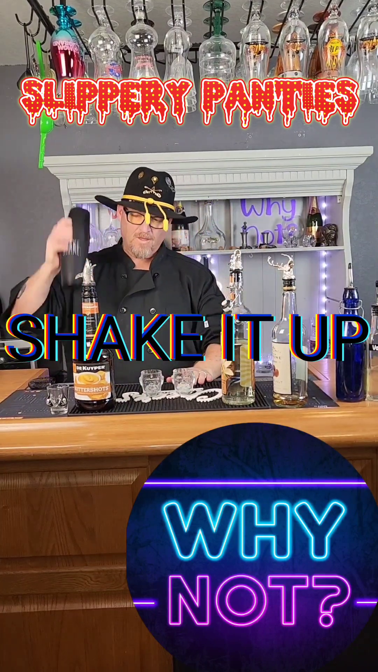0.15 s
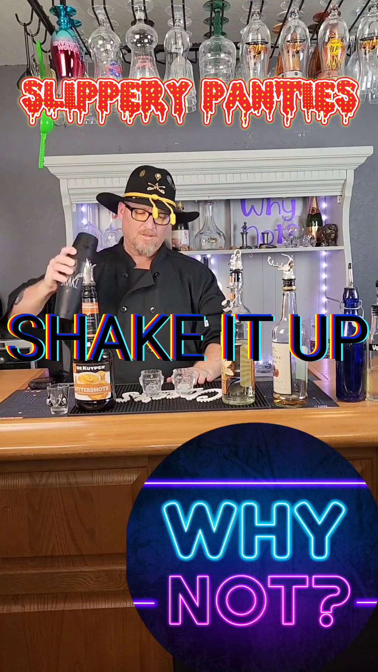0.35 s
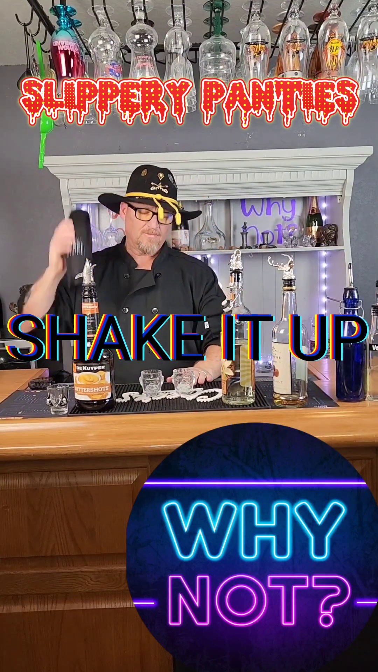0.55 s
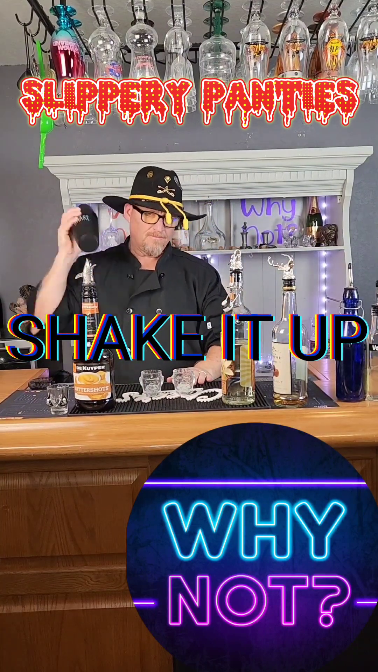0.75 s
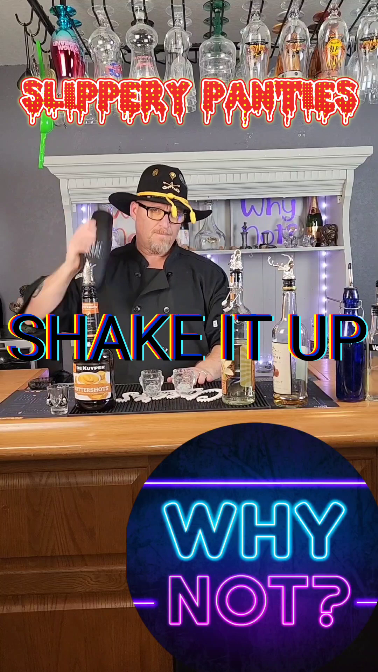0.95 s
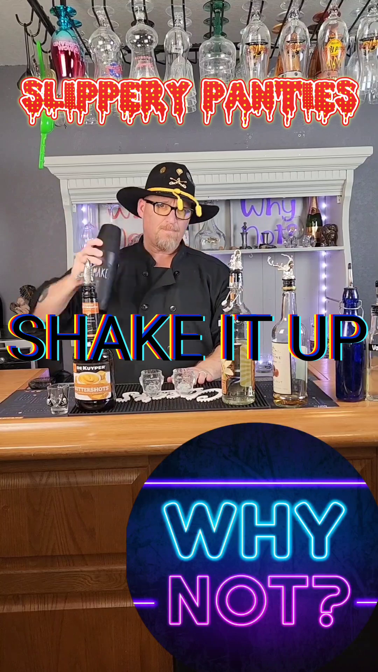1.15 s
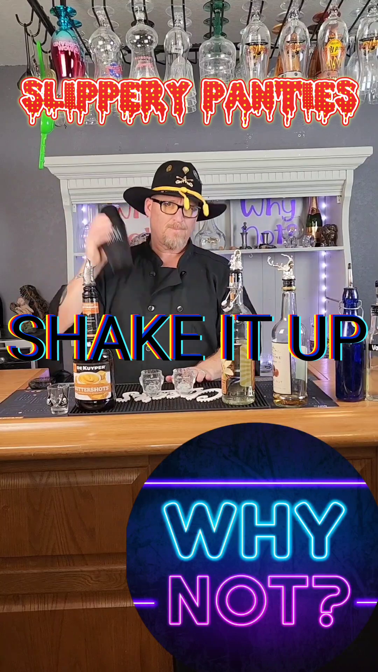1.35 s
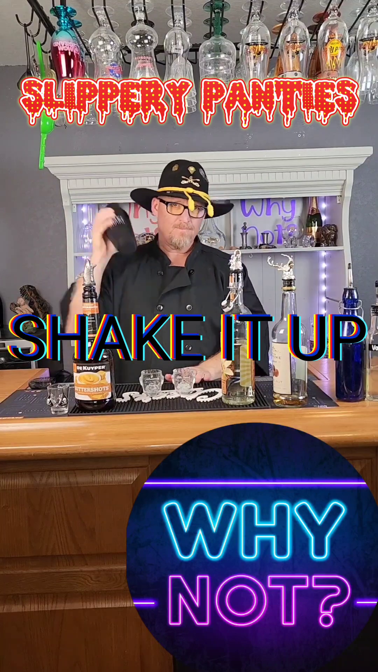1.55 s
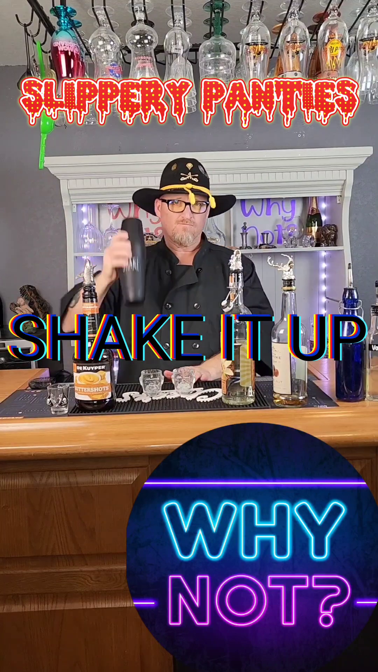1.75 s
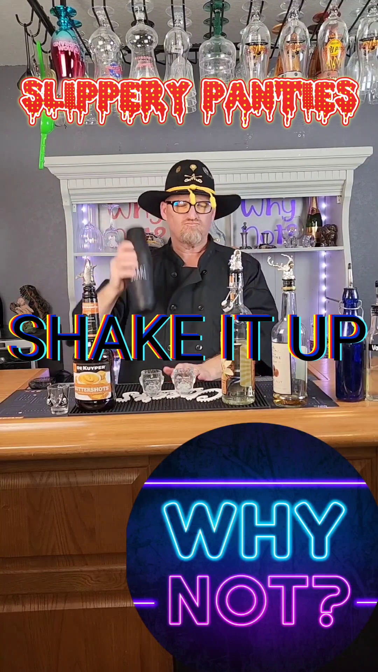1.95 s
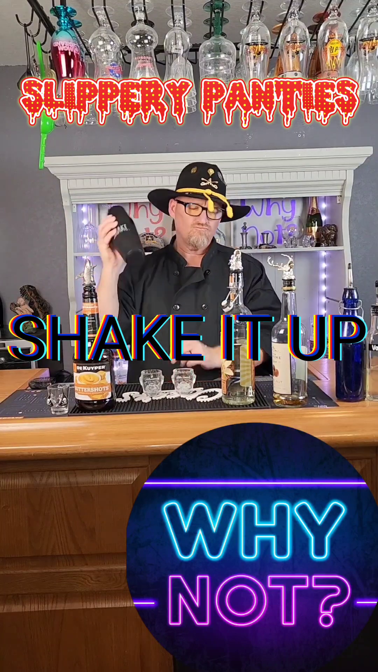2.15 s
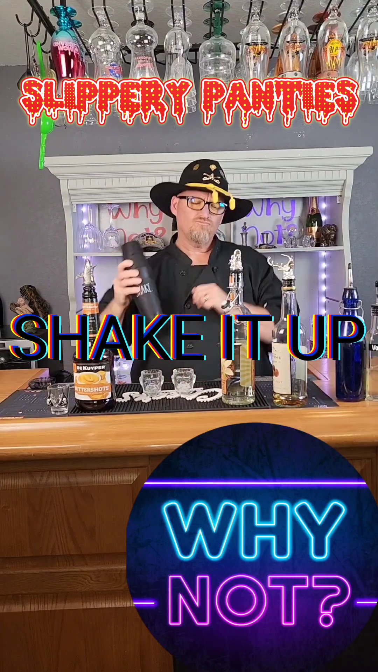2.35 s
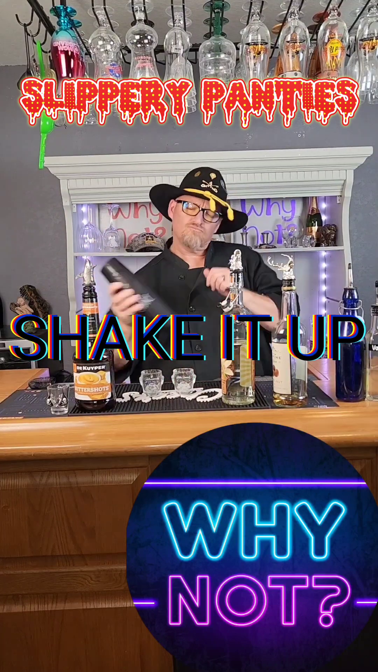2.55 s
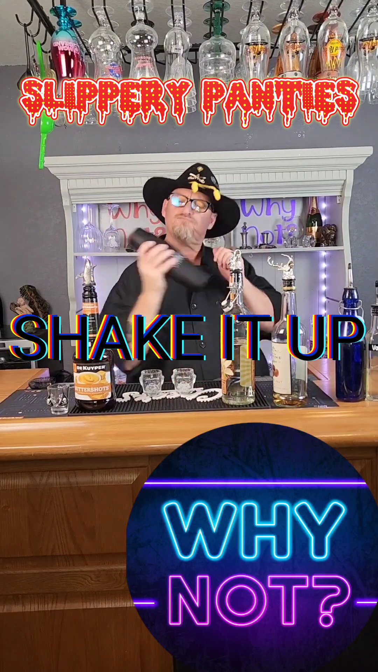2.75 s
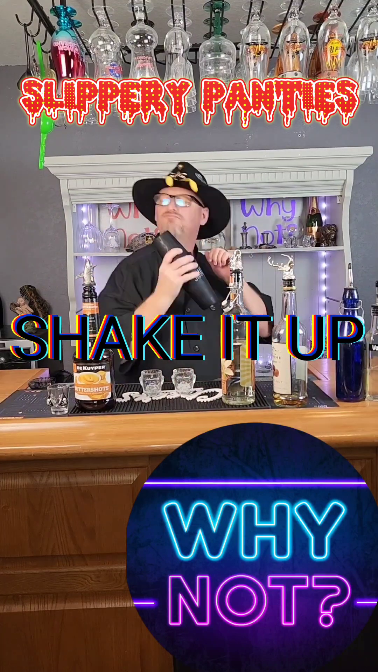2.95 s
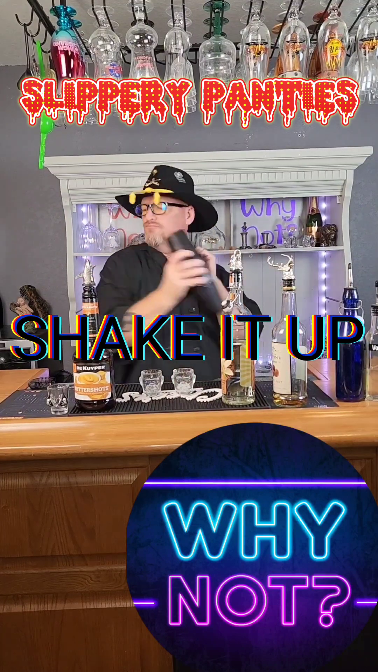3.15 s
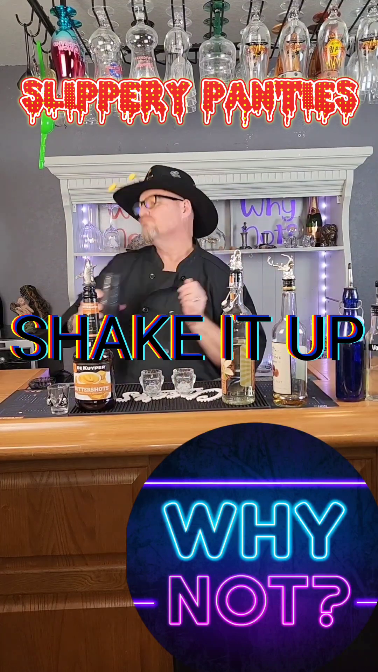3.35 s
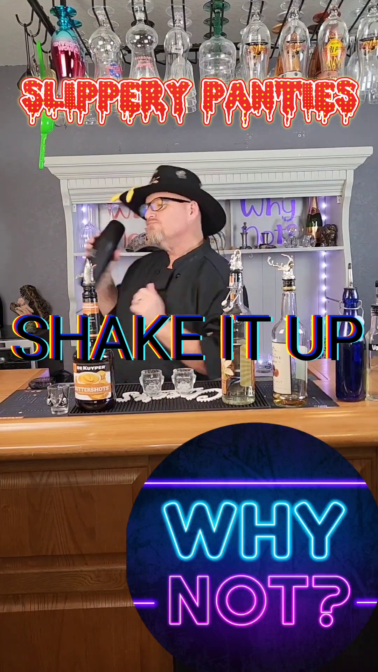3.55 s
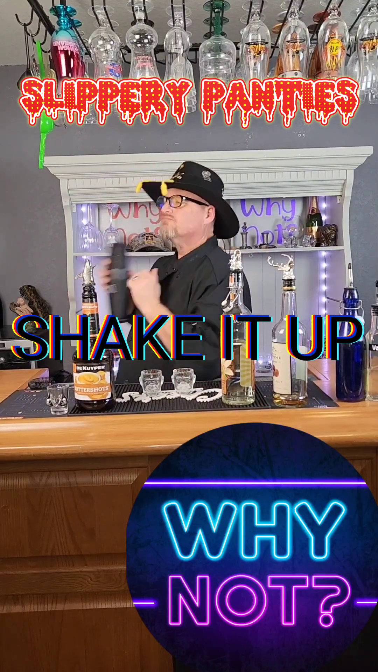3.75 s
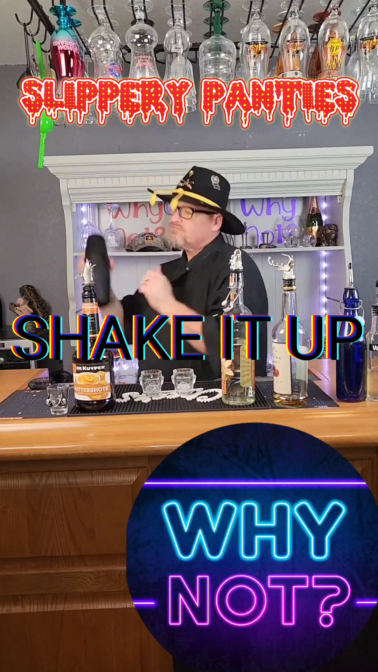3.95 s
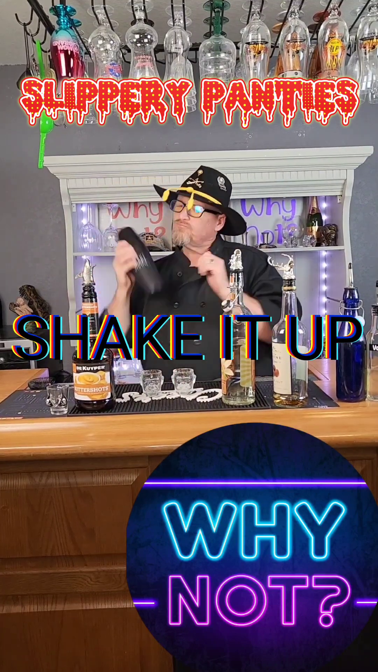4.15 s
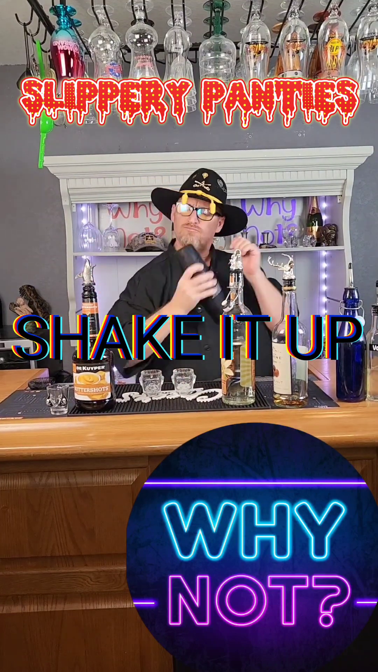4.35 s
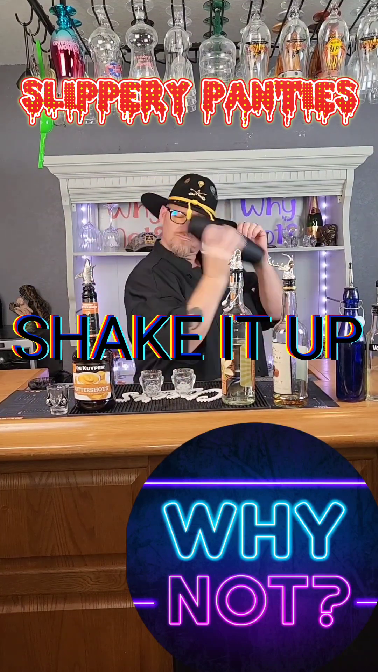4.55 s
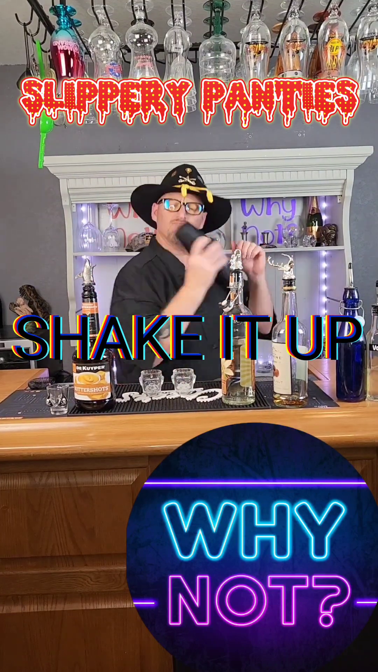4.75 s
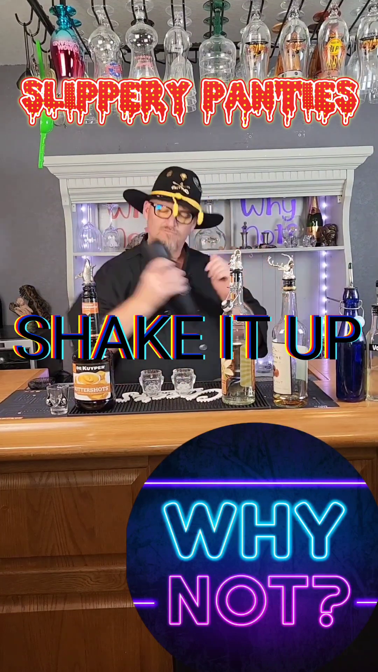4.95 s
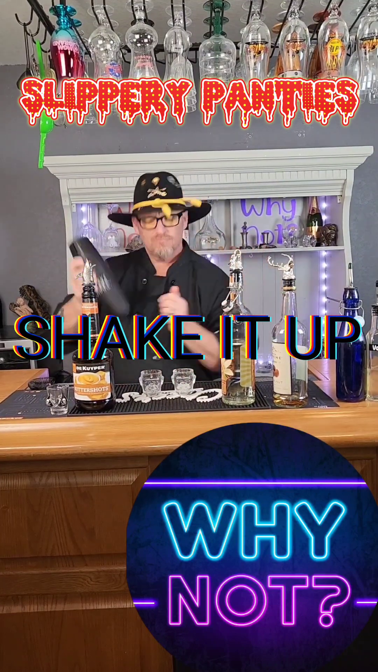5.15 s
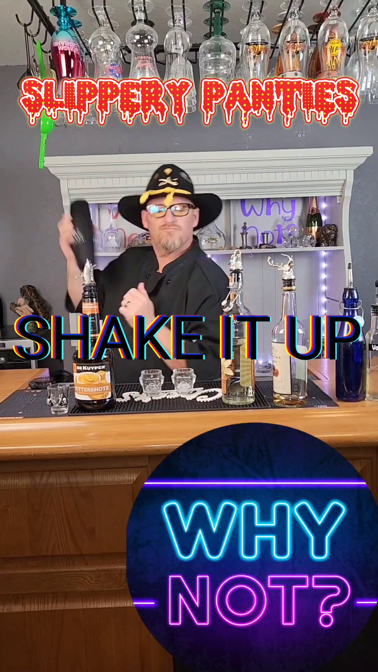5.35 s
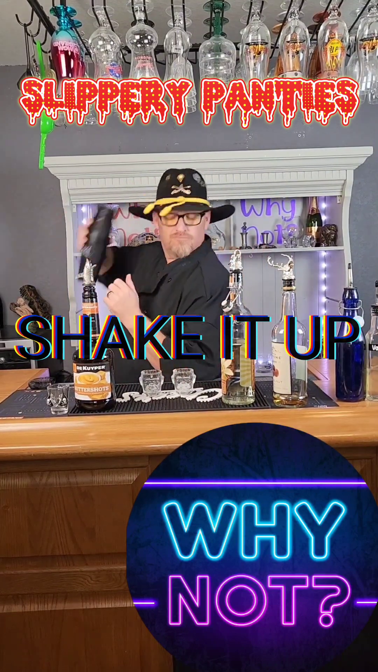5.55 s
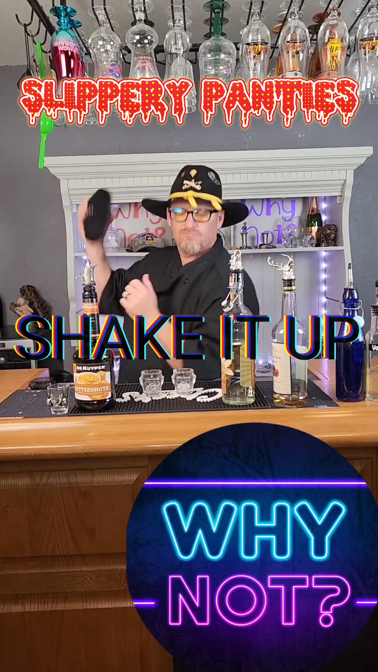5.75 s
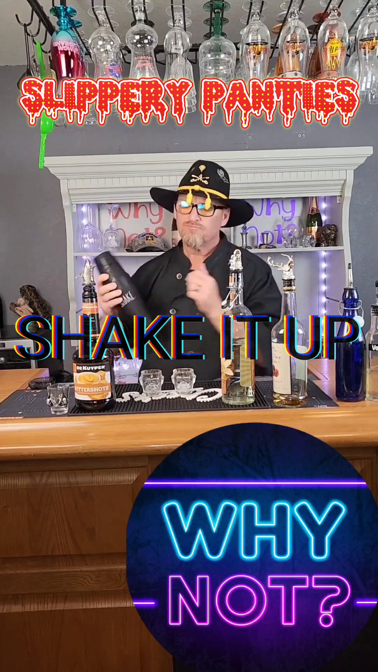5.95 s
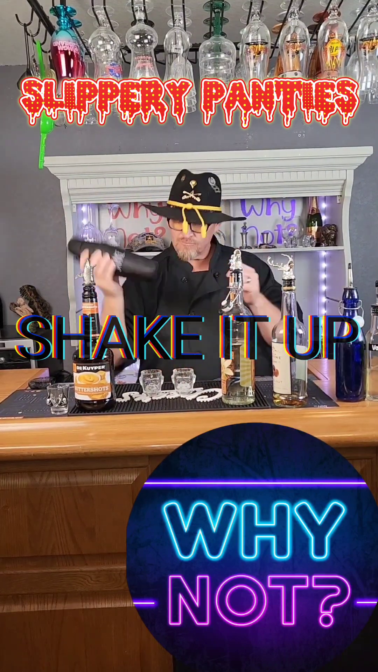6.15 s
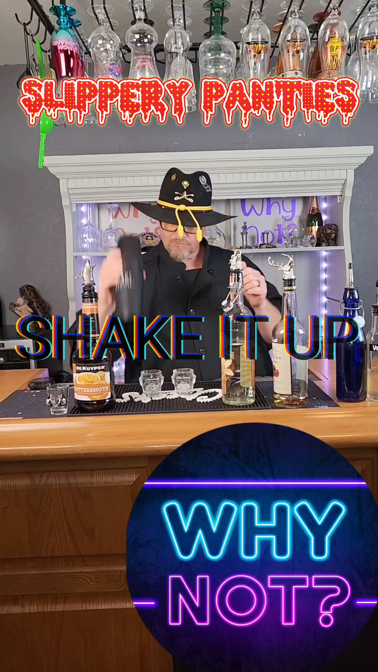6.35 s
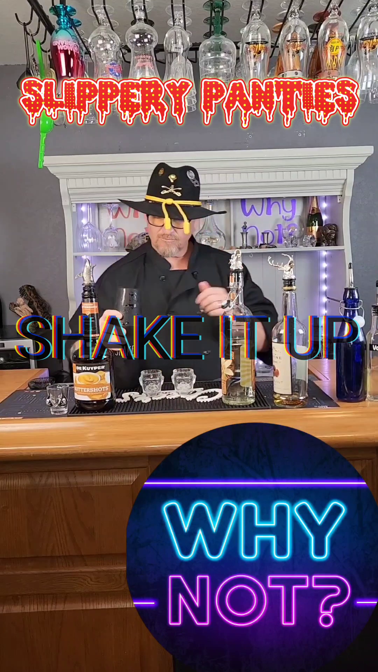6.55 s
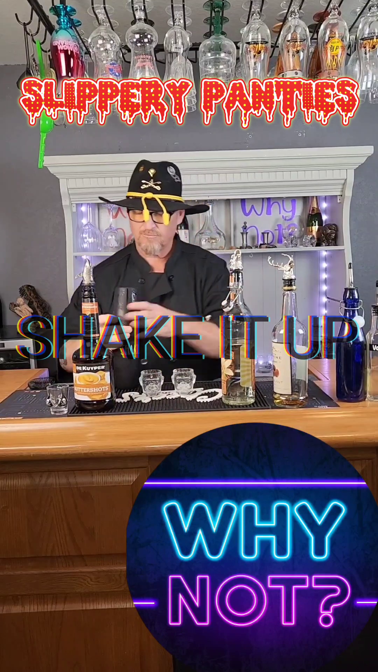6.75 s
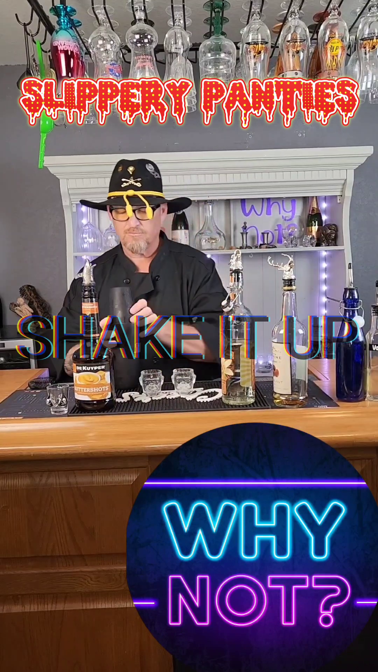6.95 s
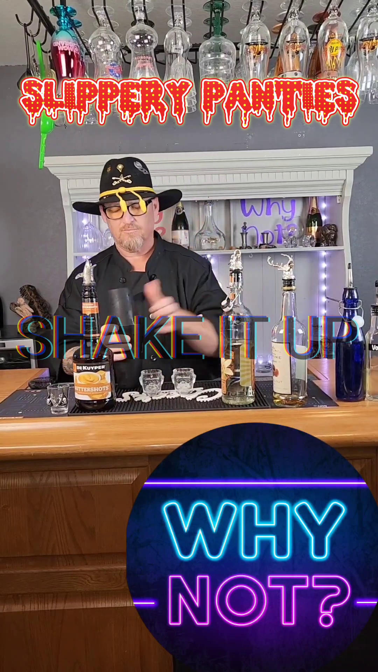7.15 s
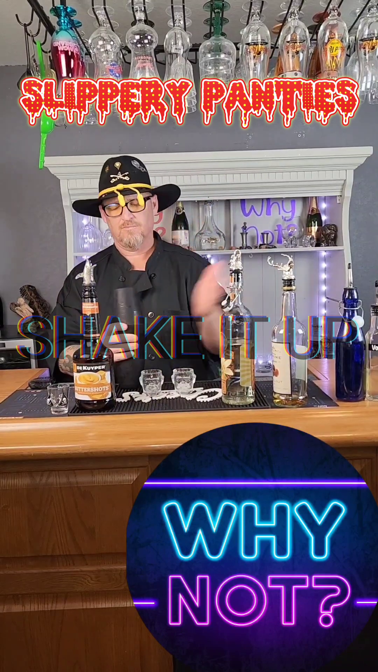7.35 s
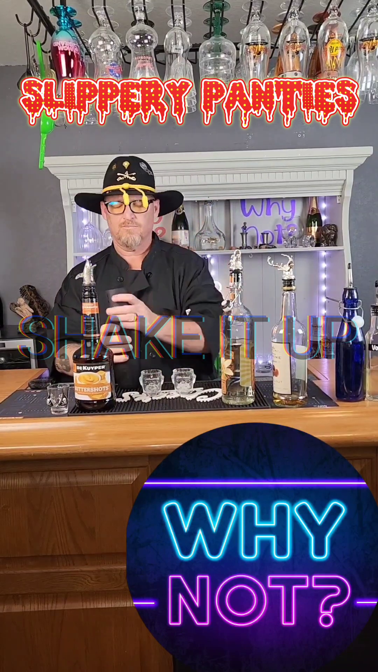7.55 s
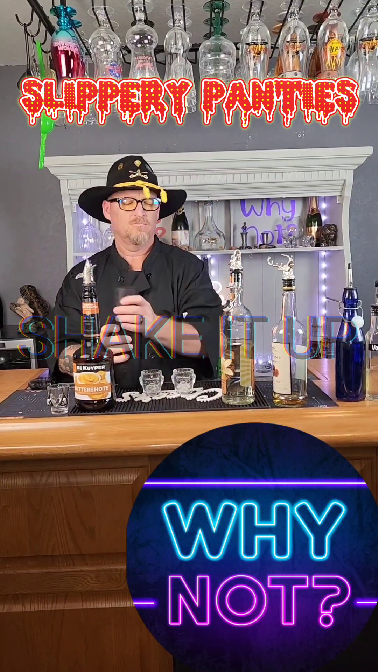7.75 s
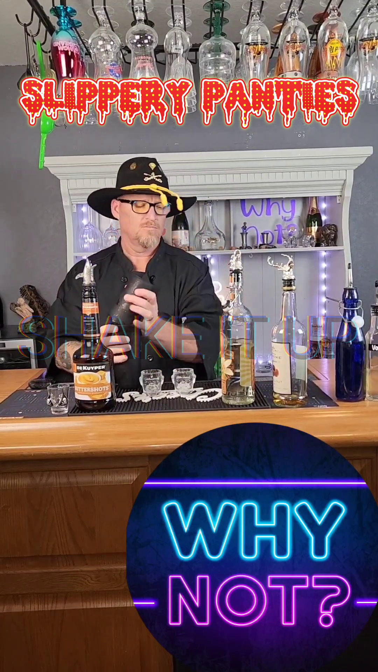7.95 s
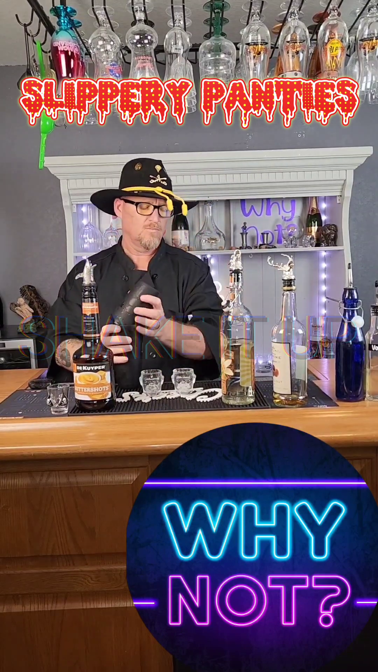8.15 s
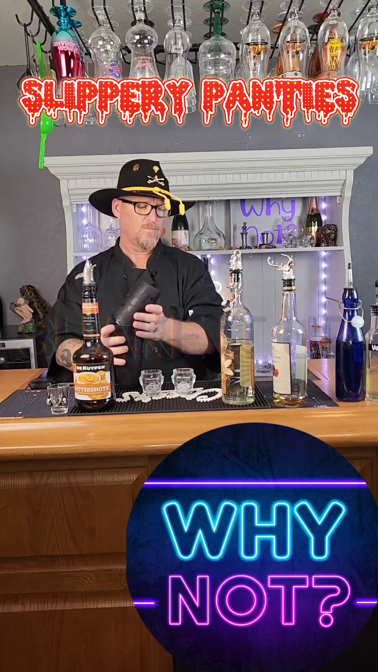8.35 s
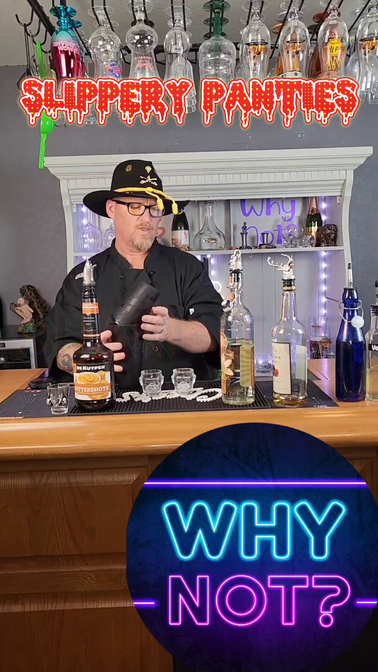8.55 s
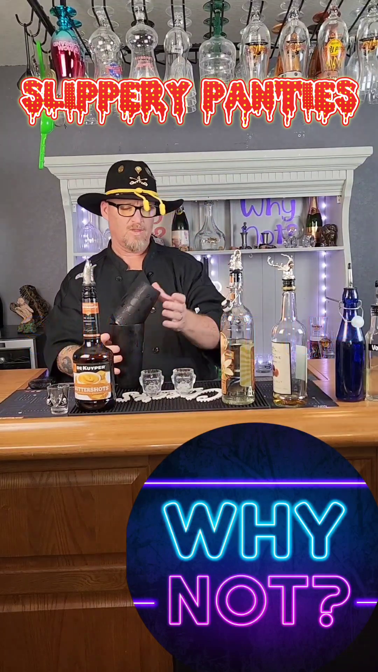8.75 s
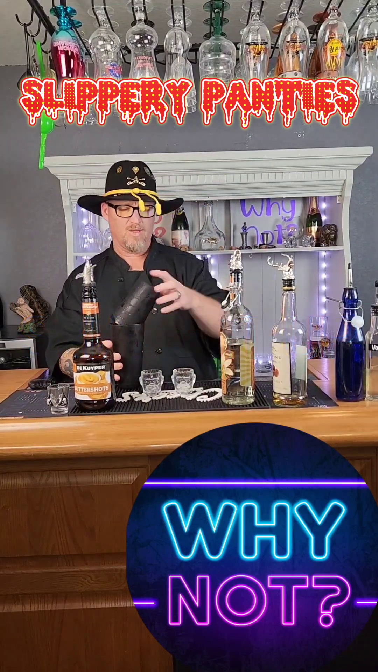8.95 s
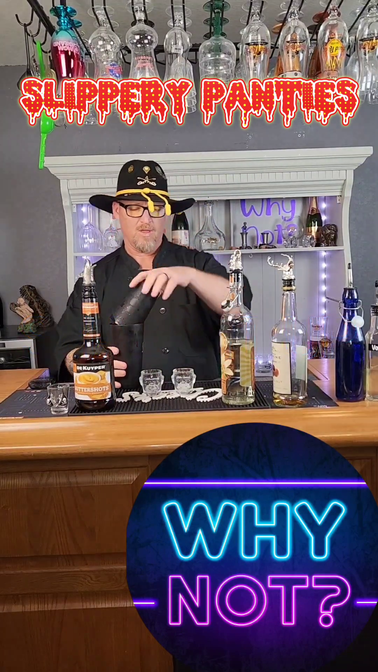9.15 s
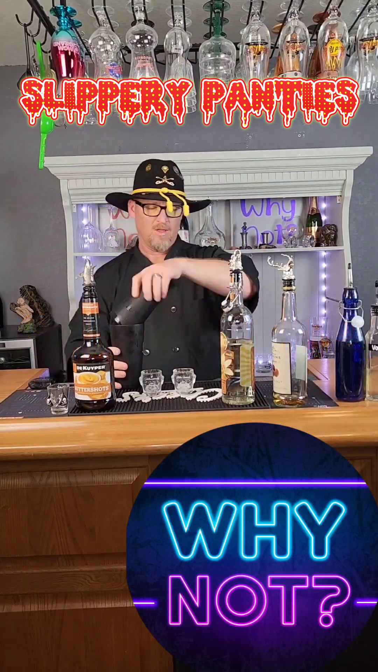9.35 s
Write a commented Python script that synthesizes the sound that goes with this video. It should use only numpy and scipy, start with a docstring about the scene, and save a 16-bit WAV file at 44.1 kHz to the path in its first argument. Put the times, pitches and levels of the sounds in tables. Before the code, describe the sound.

In a small, lively barroom, a metal cocktail shaker is shaken vigorously, cubes clattering and splintering while liquid sloshes. The quick strokes turn uneven, then end in a loud, close knock as the tin hits the wooden counter. After a short lull come a bright slap on the metal, a few taps and a soft pop. The shaking sounds roomy and slightly distant, with ventilation humming faintly underneath.

```python
"""A metal cocktail shaker full of ice and liquid, shaken hard behind the bar of a small, live room.
Cubes thud on the end caps, clatter on the wall and splinter while the liquid sloshes. The tin is slammed
onto the wooden counter, the ice settles, a palm slaps the seal free and the lid pops loose.
A two-port stereo microphone stands a little to the right of the action, far enough off for the shaking
to be more room than direct sound. Ventilation rumbles underneath."""
import sys
import numpy as np
from scipy import signal
from scipy.fft import rfft, irfft
from scipy.io import wavfile
from scipy.ndimage import uniform_filter1d

SR = 44100
rng = np.random.default_rng(int(sys.argv[2]) if len(sys.argv) > 2 else 0)


def transcribe(signal):
    """Save signal, clipped to [-1, 1], as a 16-bit WAV file at the path in sys.argv[1]."""
    frames = np.atleast_2d(signal).T
    limited = np.clip(frames, -1, 1)
    pcm = np.round(limited * 32767).astype(np.int16)
    wavfile.write(sys.argv[1], SR, pcm)


N = 414027
TIME = np.arange(N) / SR


def from_db(db):
    """Decibels to gain."""
    return 10 ** (np.asarray(db) / 20)


def unit_energy(x):
    """Scale so that the squares of each channel sum to one."""
    return x / np.sqrt(np.sum(x ** 2, axis=-1, keepdims=True) + 1e-20)


def at_hz(points, hz):
    """Read a table along a log-frequency axis."""
    known_hz, values = np.transpose(points)
    return np.interp(np.log(np.maximum(hz, 1)), np.log(known_hz), values)


def convolve(x, response):
    """Pass a sound through an impulse response, channel by channel."""
    x, response = np.atleast_2d(np.float32(x), np.float32(response))
    return signal.oaconvolve(x, response, axes=-1)[:, :N]


def colour(x, spectrum, size=8192):
    """A causal (minimum-phase) filter of this spectrum that keeps the power of white sound."""
    gain = from_db(at_hz(spectrum, np.fft.rfftfreq(size, 1 / SR)))
    cepstrum = irfft(np.log(gain))
    cepstrum[1:size // 2] *= 2
    cepstrum[size // 2 + 1:] = 0
    return convolve(x, unit_energy(irfft(np.exp(rfft(cepstrum)))))


def clicks(at, sizes):
    """Single-sample pulses at the given samples."""
    return np.bincount(at, sizes, N)[:N]


def strikes(rows):
    """Clicks from rows of t/s, level/dB."""
    s, db = np.transpose(rows)
    return clicks((s * SR).astype(int), from_db(db))


def ring(x, hz, t60):
    """A unit click sets a sine of height 1 ringing."""
    radius, angle = from_db(-60 / (t60 * SR)), 2 * np.pi * hz / SR
    return signal.lfilter([0, np.sin(angle)], [1, -2 * radius * np.cos(angle), radius ** 2], x + 1e-18)


def body(x, modes):
    """Drive all modes of an object; neighbouring modes move in opposite directions."""
    return sum((-1) ** k * from_db(db) * ring(x, hz, t60) for k, (hz, db, t60) in enumerate(modes))


# the decay of the barroom: f/Hz, t60/s
ROOM_T60 = [(80, 0.27), (300, 0.32), (1000, 0.24), (3000, 0.29), (8000, 0.25), (16000, 0.3)]
def room(x, direct_db, left_db, port_gap_s=0.000515, late_db=-25, late_stretch=2.3):
    """One spot as the microphone hears it: direct sound, then reflections dying band by band."""
    t = TIME[:SR * 3 // 4]
    hz = np.fft.rfftfreq(len(t), 1 / SR)
    mid, side = rfft(rng.standard_normal((2, len(t))))
    alike = 0.99 * np.sinc(2 * hz * port_gap_s)   # long waves reach both ports alike
    spectrum = np.sqrt(1 + alike) * mid + np.sqrt(1 - alike) * side * [[1], [-1]]
    edges_hz, tail = np.geomspace(30, 19000, 12), 0
    for low, high in zip(edges_hz, edges_hz[1:]):
        band = irfft(spectrum * (hz >= low) * (hz < high), len(t))
        fall_db = -60 * t / at_hz(ROOM_T60, np.sqrt(low * high))
        tail += band * (from_db(fall_db) + from_db(late_db + fall_db / late_stretch))
    response = unit_energy(tail * (t > .001))
    response[[0, 1], [0, 3]] += from_db(direct_db)   # the left port is reached 3 samples sooner
    return convolve(x, unit_energy(response)) * from_db([[left_db], [-left_db]])


def swung(x, swings_per_s, direct_db, left_db, spots=10):
    """The tin travels round a loop of spots behind the bar, each with reflections of its own."""
    position, heard = TIME * swings_per_s * spots, 0
    for k in range(spots):
        away = np.abs((position - k + spots / 2) % spots - spots / 2)
        heard += room(x * np.sqrt(np.maximum(1 - away, 0)), direct_db, left_db)
    return heard


# throws of the ice against the tin; square blows on an end are heavier than glancing ones:
# t/s, attack/s, length/s, level/dB, squareness/dB
JOLTS = [(0.0, 0.0027, 0.02, -22.5, 1), (0.119, 0.031, 0.076, -24.5, 0), (0.265, 0.002, 0.02, -21.5, 3.5),
         (0.382, 0.017, 0.092, -28.0, 0.5), (0.543, 0.005, 0.032, -22.5, -1.5),
         (0.634, 0.02, 0.069, -22.5, -2), (0.792, 0.01, 0.029, -25.5, 1.5),
         (0.928, 0.0077, 0.044, -22.5, -1.5), (1.057, 0.008, 0.051, -25, 0.5),
         (1.196, 0.009, 0.035, -21.5, 1), (1.313, 0.02, 0.043, -19.5, -1), (1.448, 0.025, 0.053, -23, -0.5),
         (1.588, 0.004, 0.028, -21.5, 0.5), (1.627, 0.006, 0.022, -21.0, 0),
         (1.736, 0.0082, 0.041, -23.0, 0.5), (1.872, 0.023, 0.026, -14.5, -1.5),
         (2.014, 0.008, 0.031, -23.5, 3.5), (2.162, 0.0022, 0.023, -20, 1), (2.274, 0.004, 0.01, -34, 9.5),
         (2.483, 0.0024, 0.0083, -25, 2), (2.761, 0.03, 0.06, -28, -1.5), (2.91, 0.005, 0.03, -32.5, 5.5),
         (2.986, 0.002, 0.024, -26.5, -3.5), (3.042, 0.0077, 0.05, -26.0, 0.5),
         (3.16, 0.005, 0.034, -30.5, 2), (3.217, 0.002, 0.1, -31.5, 0), (3.449, 0.0027, 0.033, -31.5, 3),
         (3.497, 0.025, 0.065, -25.5, 0.5), (3.704, 0.028, 0.09, -30.5, 0.5),
         (3.861, 0.0027, 0.057, -28.5, 3), (3.901, 0.11, 0.13, -25.5, -3.5),
         (4.213, 0.0022, 0.033, -28, 3.5), (4.383, 0.0078, 0.028, -26.5, -3.5),
         (4.51, 0.049, 0.075, -25, -0.5), (4.673, 0.091, 0.052, -22, -3.5),
         (4.818, 0.0056, 0.031, -27, 2.0), (4.89, 0.0081, 0.015, -25.0, -2.5),
         (4.965, 0.002, 0.022, -26, -1), (5.017, 0.002, 0.022, -27, 0.0), (5.09, 0.03, 0.067, -28.5, 1),
         (5.245, 0.006, 0.045, -34, -4.5), (5.314, 0.0023, 0.0061, -35, 8.5),
         (5.377, 0.074, 0.059, -24, -0.5), (5.571, 0.002, 0.088, -30.5, 1.5),
         (5.728, 0.019, 0.039, -26.5, -1), (5.875, 0.004, 0.013, -28, -2.5),
         (5.904, 0.015, 0.055, -24.5, -0.5), (6.054, 0.092, 0.05, -21.5, -1.0),
         (6.241, 0.0054, 0.029, -37, 0), (6.417, 0.0022, 0.014, -32.5, 1),
         (6.496, 0.006, 0.0077, -38, -4.5), (6.589, 0.0041, 0.03, -20, 7.5), (6.641, 0.002, 0.046, -24, 6),
         (6.878, 0.0036, 0.013, -42.5, 4.5), (6.932, 0.004, 0.033, -44.5, 4), (7.017, 0.004, 0.037, -51, 5),
         (7.121, 0.004, 0.012, -50, 4.5), (7.256, 0.002, 0.024, -49.5, 2.0), (7.553, 0.004, 0.074, -42, 7),
         (7.838, 0.005, 0.028, -46.5, 1), (7.88, 0.0015, 0.069, -40.5, 2),
         (8.187, 0.002, 0.012, -47.5, -1.5), (8.243, 0.0025, 0.0072, -49, 2)]
# how slosh, end cap, wall and splinters take a jolt: level/dB, share of squareness, multiple of attack
JOLT_RESPONSE = [(-12.5, 1.25, .3), (-9, 1.17, .35), (-1.08, -0.15, 1.0), (-6.5, -0.46, 1.7)]
# ice sliding along the wall under the jolts, loudest as the fast shaking ends,
# dying away after the slam: t/s, level/dB
SLIDE = [(0.0, -36.5), (0.9, -38.5), (1.8, -33.5), (2.1, -35), (2.4, -30), (2.53, -34.5), (2.619, -37.5),
         (3.1, -39), (3.4, -45), (4.45, -36.0), (4.85, -44.5), (5.7, -40), (6.35, -49), (6.75, -39.5),
         (6.92, -56), (7.3, -65), (7.42, -71.5), (8.4, -70.5)]
# share of the sliding in slosh, end cap, wall and splinters: level/dB
SLIDE_SHARE_DB = [-13, -10.5, -2, -9]
def impacts(part, per_s, spread_db, sharp_attack_s=0.0019, follow_s=.003):
    """Cubes land at random, each spending the energy gathered until the next: gives samples and sizes."""
    slide_s, slide_db = np.transpose(SLIDE)
    part_db, square_share, slowness = JOLT_RESPONSE[part]
    sliding = from_db(np.interp(TIME, slide_s, slide_db) + SLIDE_SHARE_DB[part])
    power = sliding ** 2 * (TIME < slide_s[-1])
    lands = rng.random(N) < per_s / SR
    t = TIME[:SR // 2]
    for s, attack, length, db, square_db in JOLTS:
        start = round(s * SR)
        peak = from_db(db + part_db + square_share * square_db) ** 2
        rise = 1 - np.exp(-t / (slowness * attack))
        power[start:start + len(t)] += peak * rise * np.exp(-(t / length) ** 2)
        # one cube leads, harder in a sharp jolt, and the rest pile in
        power[start] += peak * sharp_attack_s ** 2 / attack * SR
        lands[[start, start + int(follow_s * SR)]] = True
    at = np.flatnonzero(lands)
    hardness = from_db(spread_db * np.clip(rng.standard_normal(len(at)), -2, 2))
    hardness /= np.sqrt(uniform_filter1d(hardness ** 2, size=5))   # a hard hit robs its neighbours
    return at, np.sqrt(np.add.reduceat(power, at)) * hardness


def rattle(hits, low_hz, high_hz, t60, tick_db, ring_count):
    """Every impact is a tick and a few brief rings, pitched at random as cube and landing spot vary."""
    at, sizes = hits
    t = TIME[:SR // 40]
    pitches = rng.uniform(low_hz, high_hz, (len(at), ring_count, 1))
    rings = np.sin(2 * np.pi * pitches * t).sum(axis=1) * from_db(-60 * t / t60)
    # the rings crowd their energy into their own band, the tick spreads it over all
    clinks = unit_energy(rings) * np.sqrt((high_hz - low_hz) / (SR / 2))
    tick = from_db(tick_db)
    clinks[:, 0] += tick
    signed_sizes = sizes * rng.choice([-1, 1], len(at)) / np.hypot(1, tick)
    samples = at[:, None] + np.arange(len(t))
    return clicks(samples.ravel(), (clinks * signed_sizes[:, None]).ravel())


# spectra of an impact in the liquid, on an end cap, on the wall and of splintering: f/Hz, level/dB
SLOSH = [(150, -26), (300, -11), (420, -6.5), (560, 0.5), (720, 0), (930, -2), (1200, 1), (2500, -50.5)]
END_CAP = [(500, -25), (850, -17), (1050, -9.5), (1250, -2), (1470, -3), (1750, -6.5), (2100, -20),
           (4000, -44)]
WALL = [(1000, -23.5), (1600, -9), (1950, -1.5), (3050, 1.5), (3520, -1.5), (4120, 3.5), (4450, 0),
        (4950, 4), (5500, -3), (6300, -27.5), (12000, -46)]
SPLINTERS = [(3000, -22), (5000, -7.5), (5900, -1), (8300, 0), (9600, -11.5), (11500, -10), (13000, -10.5),
             (16000, -15.5)]
def shaken_ice():
    """In the swinging tin, liquid sloshes; cubes thud on the end caps, clatter on the wall, splinter."""
    slosh = rattle(impacts(part=0, per_s=280, spread_db=6.5),
                   low_hz=294, high_hz=1220, t60=0.013, tick_db=0.5, ring_count=3)
    cap = rattle(impacts(part=1, per_s=330, spread_db=3.5),
                 low_hz=900, high_hz=1992, t60=0.016, tick_db=-4.5, ring_count=3)
    wall = rattle(impacts(part=2, per_s=300, spread_db=4.5),
                  low_hz=1565, high_hz=5960, t60=0.014, tick_db=1, ring_count=4)
    splinters = rattle(impacts(part=3, per_s=480, spread_db=5),
                       low_hz=5000, high_hz=16000, t60=.0045, tick_db=3, ring_count=2)
    mix = (from_db(-1.35) * colour(slosh, SLOSH) + from_db(1) * colour(cap, END_CAP)
           + from_db(-0.21) * colour(wall, WALL) + from_db(0.6) * colour(splinters, SPLINTERS))
    return swung(mix, swings_per_s=2.8, direct_db=-7, left_db=1.33)


# spectra of the ventilation's rumble and hiss: f/Hz, level/dB
RUMBLE = [(15, -52), (28, -6.5), (45, -2), (78, -2.5), (105, -7), (130, -4.5), (155, -19.5), (205, -16.5),
          (285, -24), (600, -81)]
HISS = [(100, 3), (300, -2.5), (450, 0.5), (750, -11), (1850, -14.5), (2090, -10.5), (2250, -19.5),
        (4500, -25), (8400, -27), (9400, -39.5), (16000, -41)]
def ventilation(hum_hz=75.1, side_db=-19):
    """Room tone: a low rumble and hum, alike at both ports, and a faint diffuse hiss."""
    mid, side = rng.standard_normal((2, N))
    rumble = colour(mid + from_db(side_db) * side * [[1], [-1]], RUMBLE)
    hiss = colour(rng.standard_normal((2, N)) + 0.49 * rng.standard_normal(N), HISS)
    hum = np.sqrt(2) * np.sin(2 * np.pi * hum_hz * TIME)
    mix = from_db(-46) * rumble + from_db(-60) * hiss + from_db(-50) * hum
    return mix * from_db([[.5], [-.5]])


# hard single hits on the steel: t/s, level/dB
CRACKS = [(.3856, -8), (1.4502, -5), (2.7163, -5), (2.9164, -9), (3.1648, 2), (3.3943, -7.5), (3.4342, -1),
          (4.405, -1), (4.5367, -8.5), (4.9682, 1), (5.9096, -5.5), (6.5057, -15.5), (7.0209, -18),
          (7.551, 5.5), (7.9133, -7), (8.2471, -22.5)]
# their spectrum: f/Hz, level/dB
CRACK_COLOUR = [(300, -14), (1000, -4), (4000, 0.5), (8000, -1.5), (10000, -13), (16000, -20.5)]
def steel_cracks():
    """Ice or hand hits the steel with a sharp crack, and the room answers."""
    return room(colour(strikes(CRACKS), CRACK_COLOUR), direct_db=-2, left_db=1)


# one cube lands flat on the end cap: t/s, level/dB
CLACKS = [(2.024, -29), (2.916, -35), (5.58, -33), (5.909, -25)]
# the end cap's modes: f/Hz, level/dB, t60/s
CAP_MODES = [(1190, -6, .06), (1249, 0, .09), (1337, 0, .09), (1440, -3, .07), (2563, -8, .05),
             (2650, -9, .05)]
def cap_clacks():
    """The struck end cap rings briefly, damped by the hand."""
    return room(body(strikes(CLACKS), CAP_MODES), direct_db=-3, left_db=1.2)


# blows carried into the counter: t/s, level/dB, softness of the contact/s
KNOCKS = [(2.717, -27, 0.00048), (6.59, -0.5, 0.00043), (6.6008, -1, 0.00016), (6.621, -4, 0.0003),
          (6.633, -7.5, 0.00021), (6.649, -20.5, 0.00024), (6.722, -9.5, .002), (7.551, -31, 0.00037),
          (7.562, -19.5, 0.00052), (7.58, -19, 0.00067), (7.597, -21, 0.0003), (7.69, -25, 0.0014),
          (7.94, -20, 0.0013)]
# modes of the wooden top and of the tin's base on it: f/Hz, level/dB, t60/s
COUNTER_MODES = [(45.9, -12.5, 0.37), (79, -11, 0.26), (102, -13.5, 0.17), (128, -8.5, 0.088),
                 (184, -8, 0.087), (256.15, -1, 0.039), (281.2, -1, 0.064), (338.3, -7, 0.12),
                 (397, -11, .08), (507, -10, 0.07), (542.5, -15, 0.18), (596, -15.5, 0.11),
                 (819, -13, 0.059), (1010, -15.5, 0.11), (1096, -17.5, .12), (1284, -24.5, .08),
                 (1430, -31, .14), (1674, -11, 0.085), (2030, -5.5, .12), (2325, -3, 0.076)]
def counter_knocks():
    """The tin lands and rocks on the wood, sounding close; a softer contact is a duller push."""
    force = np.zeros(N)
    for s, db, softness in KNOCKS:
        age = np.maximum(TIME - s, 0) / softness
        push = age * np.exp(-np.minimum(age, 50))
        force += from_db(db) * push / push.sum()
    return room(body(force, COUNTER_MODES), direct_db=6, left_db=1.2)


# pops of the trapped air: t/s, level/dB
POPS = [(2.717, -29.5), (8.247, -30.5)]
# the air's modes in the tin: f/Hz, level/dB, t60/s
CAVITY_MODES = [(453, 1, 0.041), (621, -5.5, 0.039), (716, -4, 0.038), (1438, -21, 0.19)]
def air_pops():
    """Air shut in the tin pops and rings hollow."""
    return body(strikes(POPS), CAVITY_MODES)


# a hand smacks the tin in passing, to free the seal and in shifting its grip: t/s, level/dB, decay/s
SLAPS = [(4.968, -24, .005), (7.542, -20, 0.0041), (7.5513, -16.5, 0.0026), (7.912, -38, 0.014)]
# spectrum of skin on steel: f/Hz, level/dB
PALM_COLOUR = [(500, -5.5), (2000, -3.5), (2800, -7), (4000, 0.5), (8300, 2.5), (9600, -9), (16000, -9)]
def palm_slaps():
    """Skin meets the steel in a short, bright smack, left of the microphone."""
    contact = np.zeros(N)
    for s, db, decay in SLAPS:
        age = np.clip((TIME - s) / decay, 0, 20)
        contact += from_db(db) * (TIME >= s) * np.exp(-age)
    return room(colour(contact * rng.standard_normal(N), PALM_COLOUR), direct_db=-0.5, left_db=2.8)


# gulps inside the tin: t/s, f/Hz, level/dB, time to peak/s
GULPS = [(5.659, 314, -38.5, 0.01), (7.307, 419, -51, 0.039)]
def liquid_gulps():
    """Liquid gulps as the tin turns, each time a low tone that swells and dies."""
    gulps = np.zeros(N)
    for s, hz, db, peak_s in GULPS:
        age = np.maximum(TIME - s, 0) / peak_s
        gulps += from_db(db) * age * np.exp(1 - age) * np.sin(2 * np.pi * hz * (TIME - s))
    return gulps


def scene():
    """The bar as it reaches the microphone's two ports; pops and gulps share one close-sounding spot."""
    shaker = shaken_ice() + counter_knocks() + steel_cracks()
    hollow = room(air_pops() + liquid_gulps(), direct_db=4, left_db=2.2)
    return shaker + hollow + palm_slaps() + ventilation() + cap_clacks()


def record(dry, low_cut_hz=24, high_cut_hz=16100):
    """The microphone drops the deepest bass, the loudest peaks are rounded and the top is cut."""
    low_cut = signal.butter(2, low_cut_hz, "high", fs=SR, output="sos")
    high_cut = signal.ellip(12, .1, 90, high_cut_hz, fs=SR, output="sos")
    rounded = np.tanh(signal.sosfilt(low_cut, dry))
    return signal.sosfilt(high_cut, rounded)


dry = scene()
out = record(dry)
transcribe(out)
```